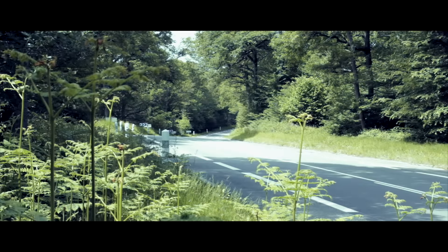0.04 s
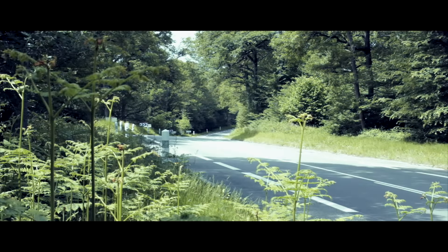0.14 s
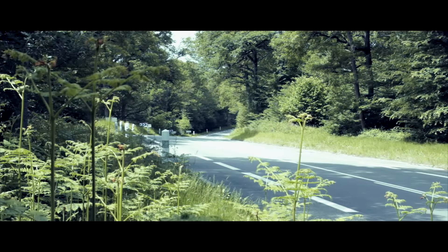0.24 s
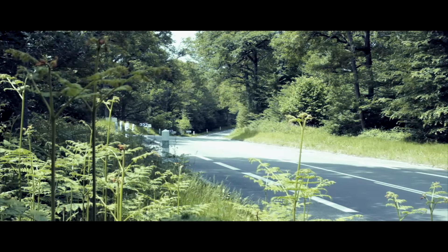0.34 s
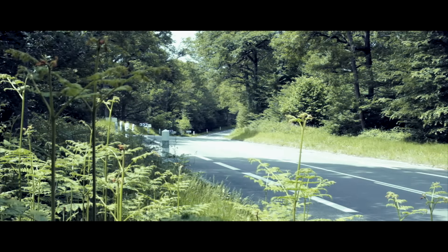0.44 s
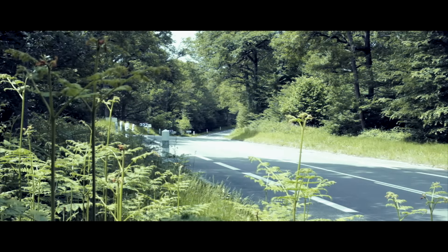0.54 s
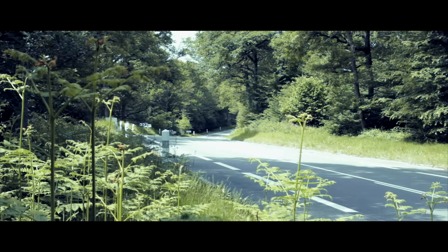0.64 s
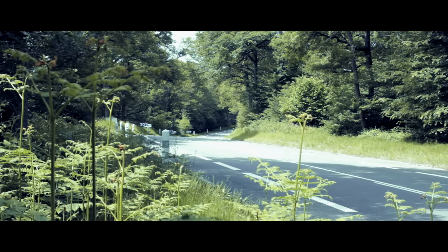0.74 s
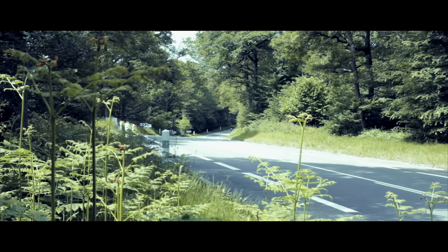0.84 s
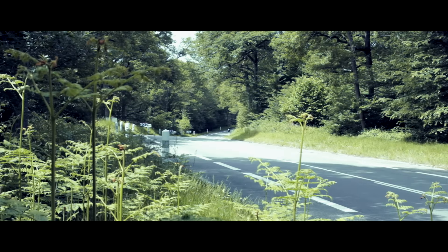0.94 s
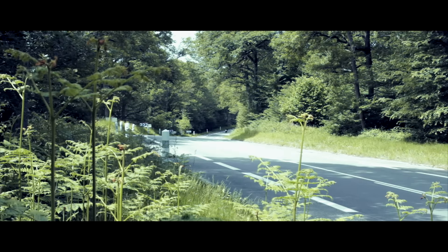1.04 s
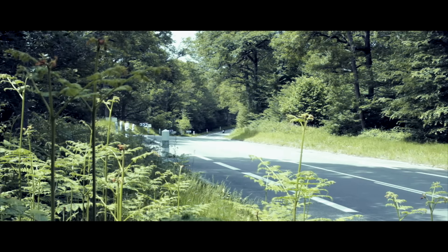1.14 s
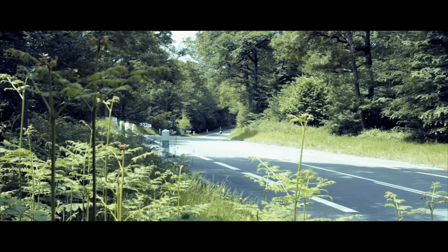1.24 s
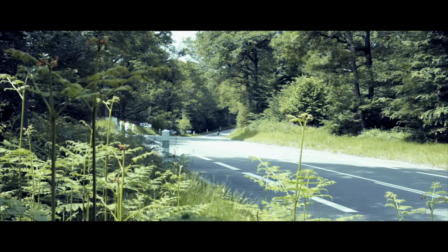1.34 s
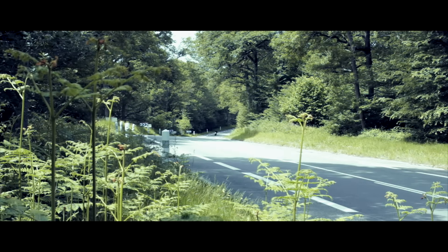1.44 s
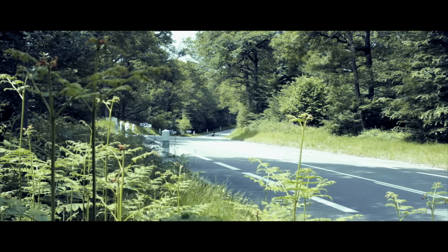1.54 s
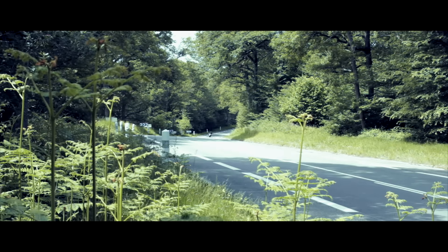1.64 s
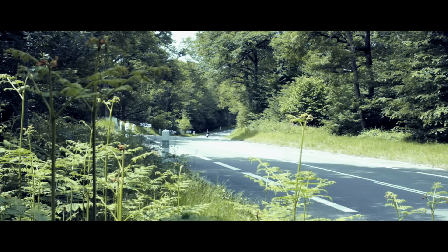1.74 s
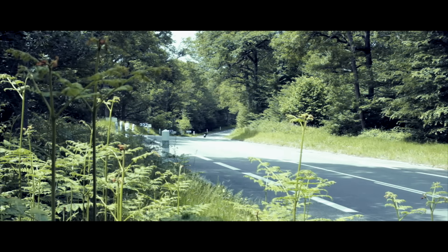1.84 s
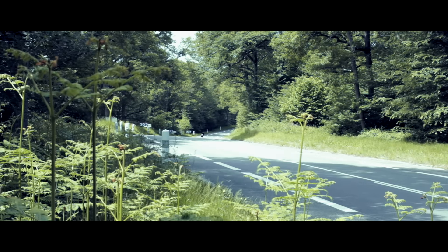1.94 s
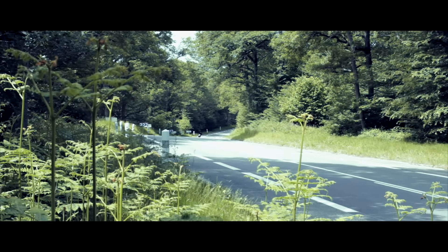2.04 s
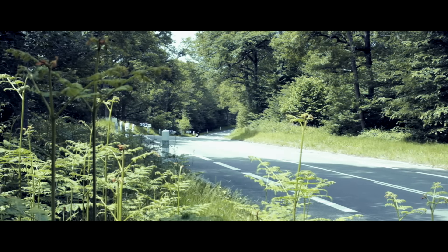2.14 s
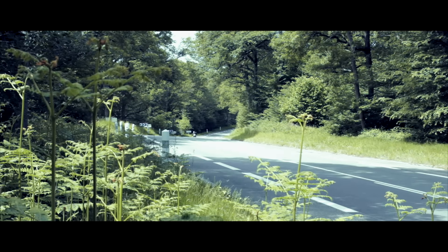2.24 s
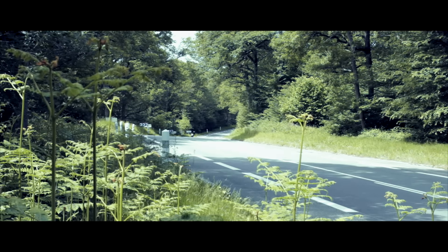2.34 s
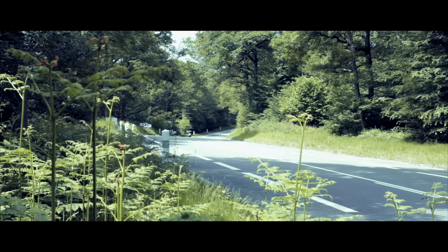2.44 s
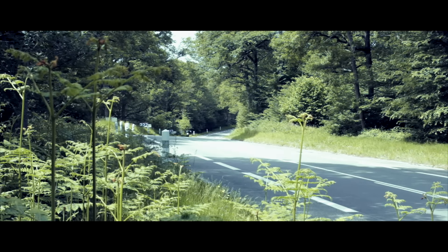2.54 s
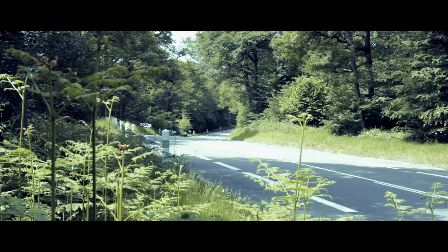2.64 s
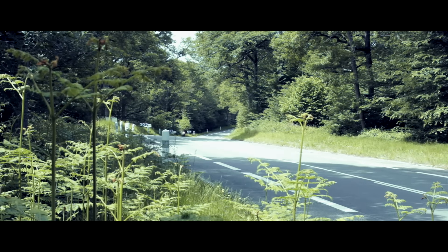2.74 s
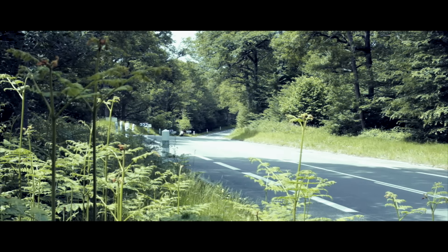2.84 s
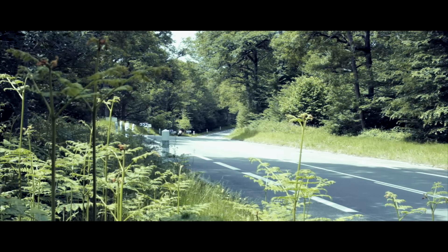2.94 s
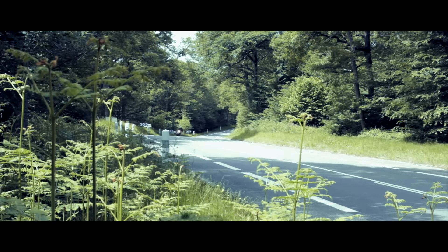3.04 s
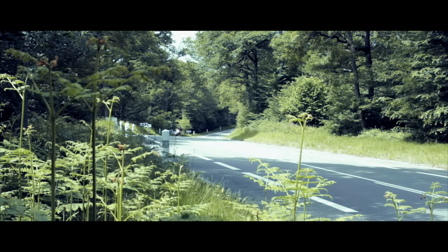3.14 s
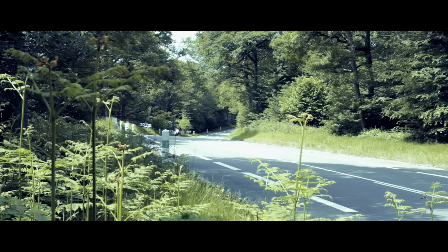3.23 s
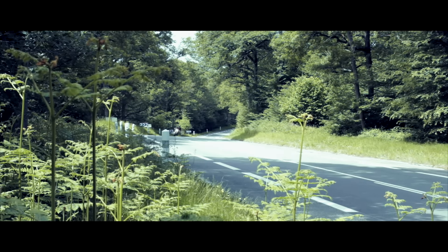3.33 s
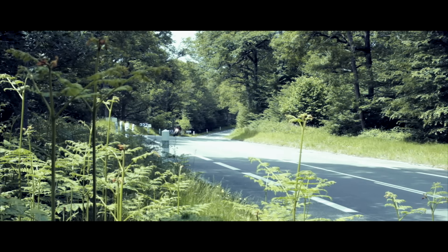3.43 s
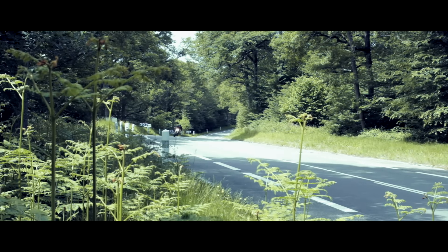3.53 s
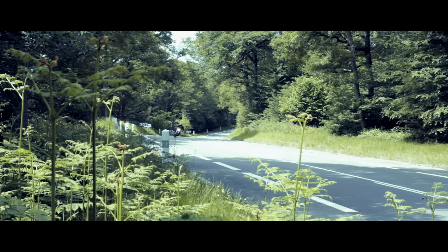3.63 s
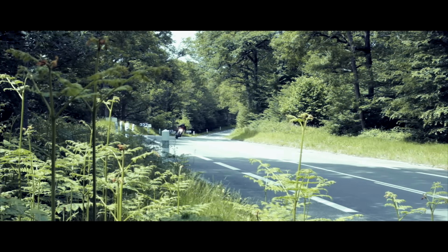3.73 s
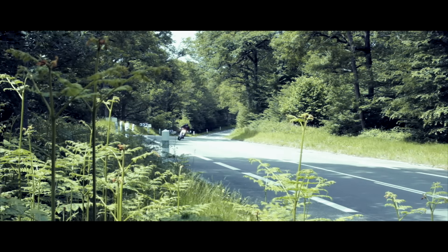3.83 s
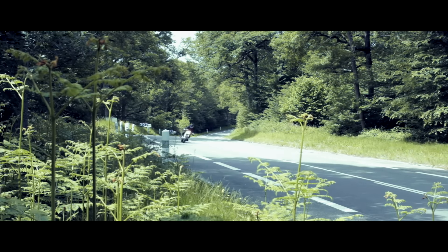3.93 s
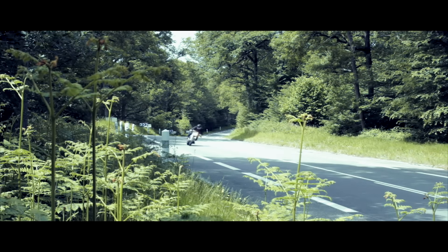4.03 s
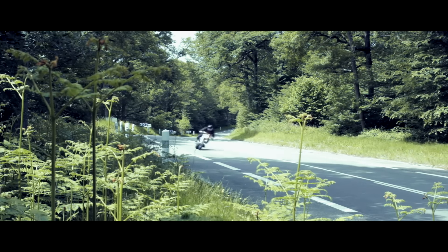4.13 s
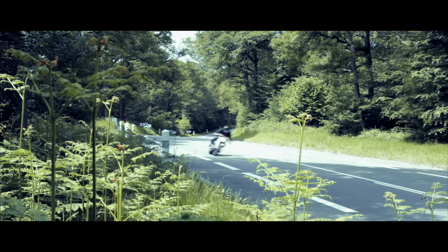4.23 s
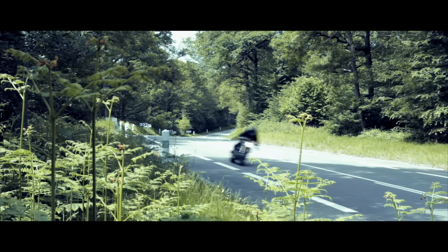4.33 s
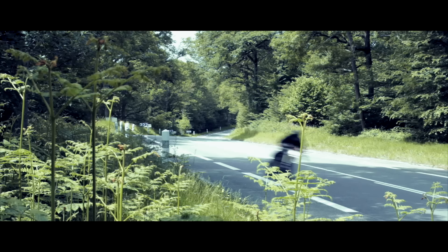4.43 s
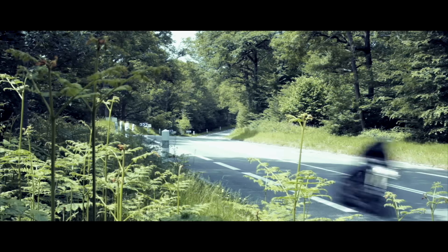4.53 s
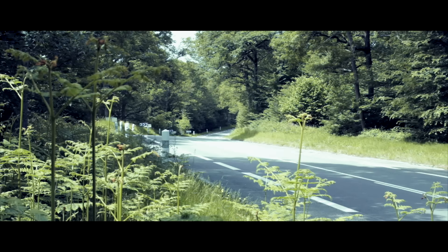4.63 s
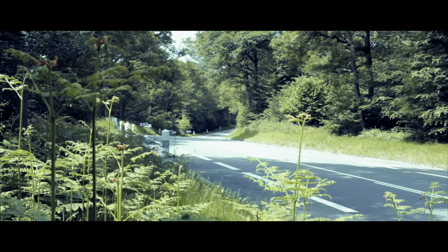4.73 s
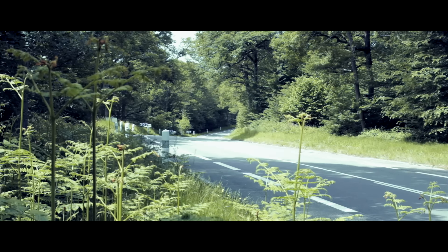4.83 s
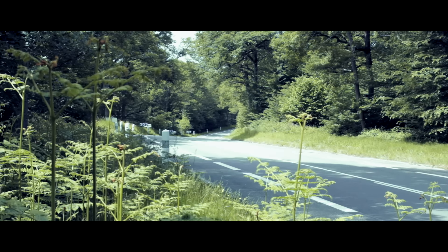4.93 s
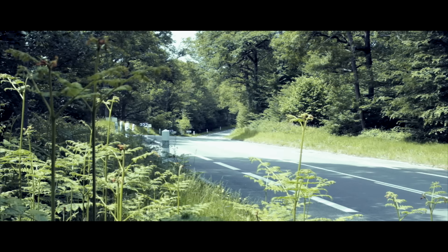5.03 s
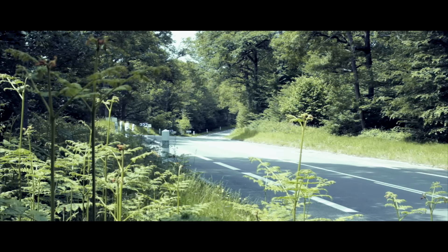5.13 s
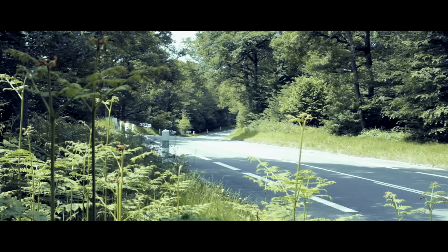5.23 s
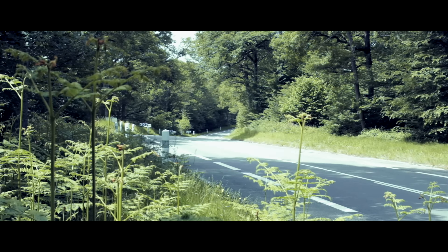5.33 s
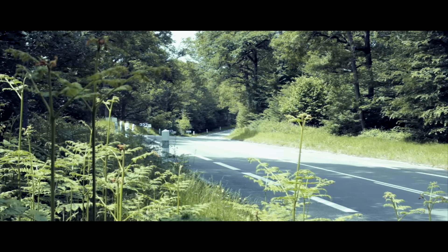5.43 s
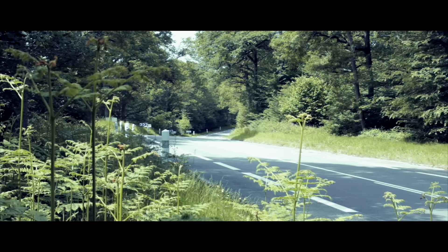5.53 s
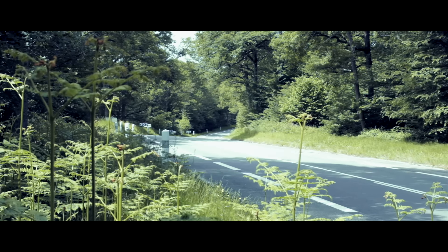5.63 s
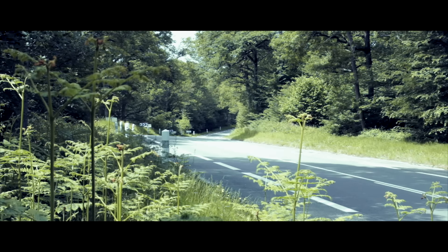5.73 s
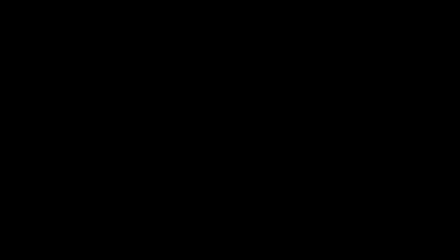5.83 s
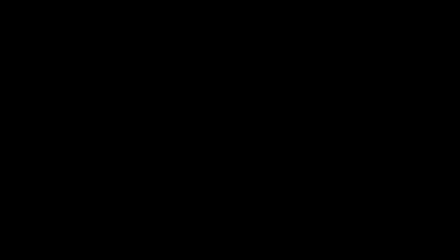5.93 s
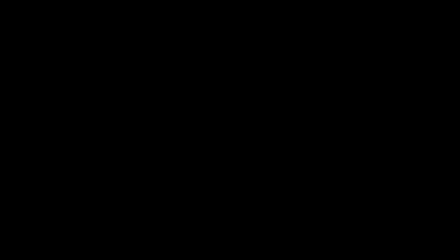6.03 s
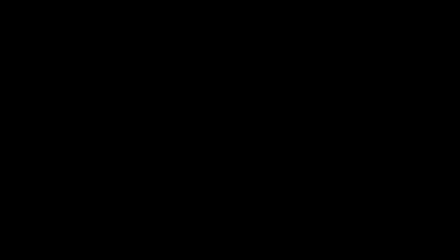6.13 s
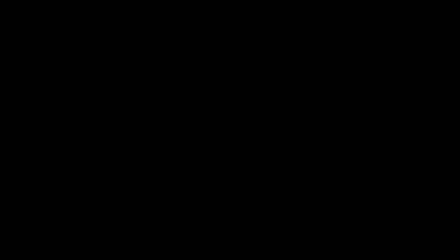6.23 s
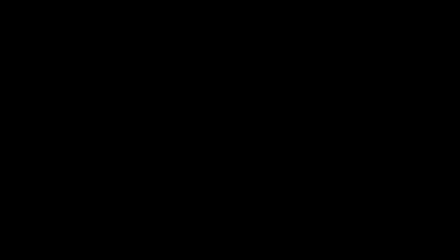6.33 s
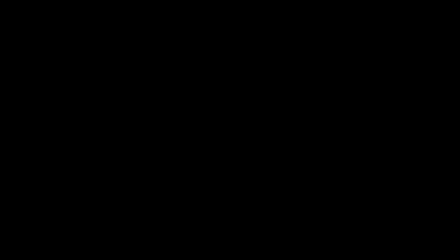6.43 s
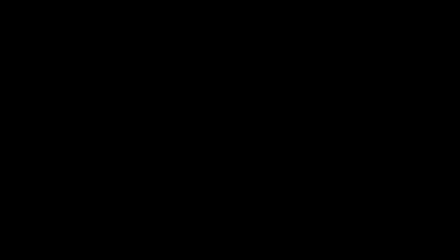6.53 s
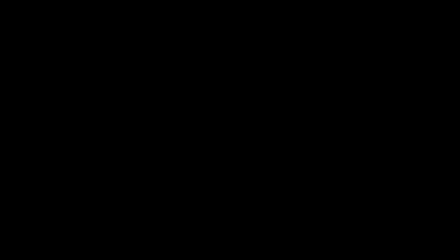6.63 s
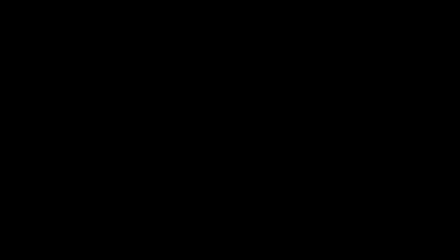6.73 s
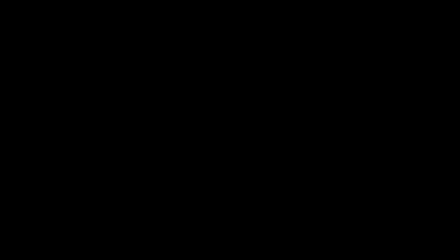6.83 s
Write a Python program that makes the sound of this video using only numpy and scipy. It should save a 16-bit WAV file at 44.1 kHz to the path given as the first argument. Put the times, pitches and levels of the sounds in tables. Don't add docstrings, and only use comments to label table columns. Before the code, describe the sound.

A twin-cylinder motorcycle drones faintly through woods with distant bird chirps, then bursts past very close, overloading the microphone, drops in pitch and fades away.

```python
import sys
import numpy as np
from scipy import signal
from scipy.fft import rfft, irfft
from scipy.io import wavfile
from scipy.ndimage import uniform_filter1d, map_coordinates

SR = 44100
rng = np.random.default_rng(int(sys.argv[2]) if len(sys.argv) > 2 else 0)


def attenuation_scalar(level_db):
    decades = np.asarray(level_db, float) / 20
    return 10 ** decades


def bounce(signal):
    frames = np.transpose(np.atleast_2d(signal))
    limited = np.clip(frames, -1, 1)
    pcm = np.round(limited * 32767).astype(np.int16)
    wavfile.write(sys.argv[1], SR, pcm)


N = 302967
SOUND_M_S, SPEED_M_S = 343, 47

# start_s, screen_db, throttle_db
RIDE = [(0, -45, 4.5), (.6, -49, 1), (.85, -48, -0.5), (.96, -52, 4), (1.3, -31, -0.5), (1.7, -23, -0.5),
        (2, -21, -1), (2.3, -34.5, -1), (2.58, -41, -1), (2.72, -26, 3), (3.1, -7.5, -0.5), (3.6, 1, -3.5),
        (4.2, 2.5, -3), (4.65, 3, -1), (4.95, -4.5, 0.5), (5.4, -1.5, -1.5), (6, 6, 5), (6.87, 4.5, 6.5)]


def unit(x):
    return x / np.sqrt(np.mean(x ** 2) + 1e-20)


def along(points, hz):
    point_hz, value = np.transpose(points)
    return np.interp(np.log(hz + 1), np.log(point_hz + 1), value)


def curves(rows):
    start_s, *columns = np.transpose(rows)
    return [np.interp(np.arange(N) / SR, start_s, column) for column in columns]


def wobble(rate_hz):
    knots = rng.standard_normal(int(N * rate_hz / SR) + 4)
    return map_coordinates(knots, [np.arange(N) * rate_hz / SR])


def coloured(x, points, causal=1, turn=0, smear_ms=0):
    size = 8192
    hz = np.fft.rfftfreq(size, 1 / SR)
    cepstrum = irfft(np.log(attenuation_scalar(along(points, hz)) + 1e-6))
    cepstrum[1:size // 2] *= 2
    cepstrum[size // 2 + 1:] = 0
    log_gain = rfft(cepstrum)
    phase = causal * log_gain.imag + turn - np.pi * smear_ms * (hz / 1000) ** 2
    response = np.roll(irfft(np.exp(log_gain.real + 1j * phase)), size // 2)
    return unit(signal.fftconvolve(x, response)[size // 2:][:N])


def rumble():
    # pitch_hz, level_db per Hz
    far_colour = [(15, -20.5), (30, -8), (60, 5), (110, 5), (200, 2), (400, -42.5)]
    level_db = -48 + 1.5 * wobble(5)
    return attenuation_scalar(level_db) * coloured(rng.standard_normal(N), far_colour)


def bird():
    # start_s, length_s, from_hz, to_hz, level_db
    whistles = [
        (.28, .09, 3050, 3700, -50),
        (.48, .05, 4200, 4330, -65),
        (.59, .04, 4340, 4360, -66),
        (.77, .03, 4325, 4305, -68),
        (.855, .03, 7080, 6850, -75),
        (1.26, .09, 3050, 3650, -50),
        (2.25, .07, 3250, 3500, -49),
    ]
    out = np.zeros(N)
    for start_s, length_s, from_hz, to_hz, level_db in whistles:
        u = np.linspace(0, 1, round(length_s * SR))
        glide_hz = from_hz + (to_hz - from_hz) * np.sin(np.pi / 2 * u) ** 2
        whistle = np.sin(np.pi * u) * np.sin(2 * np.pi * np.cumsum(glide_hz) / SR)
        out[round(start_s * SR):][:len(u)] += np.sqrt(2) * attenuation_scalar(level_db) * whistle
    return out


def wood(x):
    # pitch_hz, t60_s
    decay = [(100, 0.15), (600, 0.6), (2000, 0.087), (6000, 0.09)]
    hz, t, z = signal.stft(rng.standard_normal(SR), SR, nperseg=256)
    decay_db = -60 * t / along(decay, hz)[:, None]
    tail = signal.istft(z * attenuation_scalar(decay_db), SR, nperseg=256)[1]
    delayed = np.pad(x, (700, 0))
    return signal.fftconvolve(delayed, tail / np.linalg.norm(tail))[:N]


def shimmer(x, depth_db):
    z = signal.stft(x, nperseg=2048)[2]
    field = uniform_filter1d(rng.standard_normal(z.shape), size=4, axis=0)
    field = uniform_filter1d(field, size=7, axis=1)
    return signal.istft(z * attenuation_scalar(depth_db * unit(field)), nperseg=2048)[1][:N]


def passage():
    pass_s, gap_m = 5.085, 2.7
    sent_s = np.arange(-SR, N + SR) / SR - pass_s
    heard_s = sent_s + (np.hypot(SPEED_M_S * sent_s, gap_m) - gap_m) / SOUND_M_S
    road_m = SPEED_M_S * np.interp(np.arange(N) / SR - pass_s, heard_s, sent_s)
    return road_m, np.hypot(road_m, gap_m)


def paths():
    road_m, far_m = passage()
    screen_db, throttle_db = curves(RIDE)
    spread_db = -20 * np.log10(far_m)
    facing = -road_m / far_m
    over = lambda x: np.maximum(x, 0)
    front_db = spread_db + throttle_db - 30 * (1 - facing)
    trees_db = 18.5 + front_db + 0.081 * screen_db
    bend_db = 39.5 + front_db + screen_db - 42 * over(np.arange(N) / SR - 2.57)
    nose_db = 30 + front_db + screen_db
    boom_db = 23.5 + spread_db + throttle_db - 14 * np.exp(-(facing / .3) ** 2)
    boom_db -= 0.1 * over(-road_m - 22.3) + 2.1 * over(road_m - 25)
    tail_db = 11.5 + 0.49 * spread_db + throttle_db - 24 * (1 + facing)
    roar_db = 20 + spread_db + .27 * screen_db - 4.5 * (1 - facing)
    return trees_db, bend_db, nose_db, boom_db, tail_db, roar_db


def grit():
    # start_s, level_db
    stones = [
        (5.757, -17),
        (5.763, -8),
        (5.868, -11),
        (5.887, -20),
    ]
    t60_s = 0.003
    out, t = np.zeros(N), np.arange(SR // 50) / SR
    for start_s, level_db in stones:
        tick = attenuation_scalar(level_db - 60 * t / t60_s) * rng.standard_normal(len(t))
        out[round(start_s * SR):][:len(t)] += tick
    return out


def tyres():
    # pitch_hz, level_db per Hz
    tread_colour = [(1500, -43), (4500, -1), (9000, -23), (16000, -27)]
    level_db = -10.5 + curves(RIDE)[0] - 20 * np.log10(passage()[1])
    return attenuation_scalar(level_db + 1.5 * wobble(38)) * coloured(rng.standard_normal(N), tread_colour)


def flank(puff):
    # start_s, level_db, pitch_hz
    whine = [
        (4.96, -40, 1400),
        (5, 4, 1320),
        (5.025, 15, 1222),
        (5.045, 14, 1120),
        (5.06, 15, 960),
        (5.08, 16, 950),
        (5.1, 14, 1020),
        (5.125, 0, 1150),
        (5.18, -30, 1185),
    ]
    level_db, whine_hz = curves(whine)
    rough_hz = whine_hz * (1 + .045 * wobble(150))
    phase = 2 * np.pi * np.cumsum(rough_hz) / SR
    return attenuation_scalar(level_db) * (.15 + .8 * puff) * np.sin(phase)


def gas_roar(puff, roar_db):
    # pitch_hz, level_db per Hz
    roar_colour = [(20, -7), (60, -25), (300, 0), (900, 0), (1500, -6), (2500, -14), (3500, -13.5),
                   (4300, -28.5), (5500, -43.5), (8000, -56.5), (15000, -67)]
    noise = coloured((10.0 + puff) * rng.standard_normal(N), roar_colour)
    return attenuation_scalar(roar_db + .7 * wobble(11)) * noise


def firings(gap, scatter_db, jitter_ms):
    # start_s, cycles_hz
    revs = [(0, 59.6), (.3, 59.7), (.8, 58.8), (1.25, 58.4), (1.65, 58.8), (2.26, 58.85), (2.45, 58.2),
            (2.7, 57.9), (3, 58.2), (3.25, 58.7), (3.79, 60.15), (4.08, 60.7), (4.3, 60.7), (4.67, 61.45),
            (5.4, 61.2), (5.8, 61.35), (6.49, 62.1), (6.87, 62.5)]
    road_m, far_m = passage()
    doppler = 1 + SPEED_M_S / SOUND_M_S * road_m / far_m
    turns = np.cumsum(curves(revs)[0] / doppler) / SR
    chance = rng.standard_normal((600, 4))
    blow_turns = np.arange(600)[:, None] + np.array([.76, .76 + gap])
    at = np.interp(blow_turns, turns, np.arange(N), right=N + 20)
    at = at + jitter_ms * SR / 1000 * chance[:, :2]
    size = attenuation_scalar(scatter_db * chance[:, 2:])

    def train(place, strength):
        low = np.floor(place).astype(int)
        early = np.bincount(low, strength * (1 + low - place), N + 99)
        late = np.bincount(low + 1, strength * (place - low), N + 99)
        return (early + late)[:N]

    return [train(*cylinder) for cylinder in zip(at.T, size.T)]


def exhaust(first, second, trees_db, bend_db, nose_db, boom_db, tail_db):
    # pitch_hz, level_db per Hz
    trees_colour = [(25, -31), (68, -11.5), (136, -2), (204, -14.5), (272, 0.5), (340, 1), (408, 2),
                    (544, -1.5), (612, -12.5), (748, -10), (1156, -18.5), (1360, -40.5), (1768, -29),
                    (4400, -64)]
    bend_colour = [(25, -40), (67, -9), (135, 2.5), (202, 6), (336, 7.5), (404, -3.5), (538, 7.5),
                   (606, 10.5), (740, 3.5), (942, -21), (1144, 6), (1346, -42), (1750, -26), (4400, -59.5)]
    nose_colour = [(25, -52), (70, -9), (141, -9), (211, -11.5), (352, -4), (562, -4.5), (633, 1.5),
                   (773, -9.5), (984, 0), (1054, -0.5), (1195, -5), (1406, -23), (2039, -16),
                   (5100, -108.5)]
    boom_colour = [(25, -42), (54, -3.5), (109, -1.5), (164, -0.5), (218, 1), (272, 4.5), (327, 0),
                   (436, -2.5), (490, -23.5), (640, -13.5), (763, -11), (926, -18), (1417, -25.5),
                   (8500, -120)]
    tail_colour = [(25, -49), (54, -6.5), (109, -3), (163, -3), (272, 0), (326, 2.5), (434, 1.5),
                   (489, -0.5), (550, 1.5), (640, -10), (923, -16.5), (1086, -14), (1249, -16),
                   (7000, -120)]

    def ahead(colour, far_db):
        return coloured(first + attenuation_scalar(far_db) * second, colour, causal=.4, turn=1.1, smear_ms=.3)

    def behind(colour, far_db):
        return coloured(first + attenuation_scalar(far_db) * second, colour, causal=0.738, turn=.3, smear_ms=2.797)

    out = attenuation_scalar(trees_db) * shimmer(ahead(trees_colour, far_db=-7), depth_db=1.4)
    out += attenuation_scalar(bend_db) * shimmer(ahead(bend_colour, far_db=-1.5), depth_db=1.6)
    out += attenuation_scalar(nose_db) * shimmer(ahead(nose_colour, far_db=-2.5), depth_db=1.1)
    out += attenuation_scalar(boom_db) * behind(boom_colour, far_db=-3.0)
    out += attenuation_scalar(tail_db) * shimmer(behind(tail_colour, far_db=-2.5), depth_db=1.2)
    return out


def motorcycle():
    *exhaust_db, roar_db = paths()
    first, second = firings(gap=.347, scatter_db=1.5, jitter_ms=.035)
    puff = signal.fftconvolve(first + second, np.hanning(int(0.0053 * SR)), "same")
    return exhaust(first, second, *exhaust_db) + flank(puff) + gas_roar(puff, roar_db)


def scene():
    machine = motorcycle()
    wet_db = -20 - .08 * curves(RIDE)[0]
    echo = wood(attenuation_scalar(wet_db) * machine)
    return (machine + echo + bird() + grit() + tyres() + rumble())[None]


def band_limit(x):
    return signal.sosfilt(signal.butter(12, 15970, fs=SR, output="sos"), x)


def record(dry):
    # pitch_hz, level_db per Hz
    self_noise = [(20, 17), (200, 8), (2000, -18), (6000, -52), (9000, -33), (12000, -18), (16000, -21.5)]
    top, knee = 0.43, 30
    fade_from_s, fade_s, fade_bend = 5.05, 2.05, 1.18
    steady = signal.lfilter([1, -1], [1, -np.exp(-2 * np.pi * 12 / SR)], dry)
    x = steady + attenuation_scalar(-67.0) * coloured(rng.standard_normal(N), self_noise)
    clipped = x / (1 + np.abs(x / top) ** knee) ** (1 / knee)
    below_top_hz = np.fft.rfftfreq(N, 1 / SR) < 15830
    band = irfft(rfft(clipped) * below_top_hz, N)
    fading_s = np.maximum(np.arange(N) / SR - fade_from_s, 0)
    fade = 1 - (fading_s / fade_s) ** fade_bend
    return band_limit(band * fade)


dry = scene()
out = record(dry)
bounce(out)
```